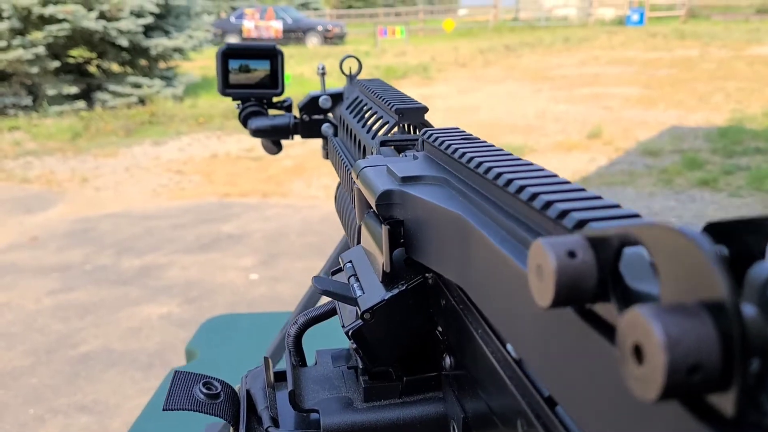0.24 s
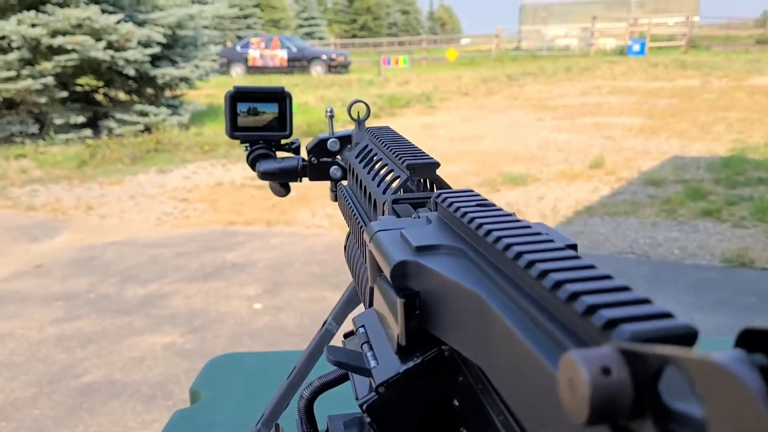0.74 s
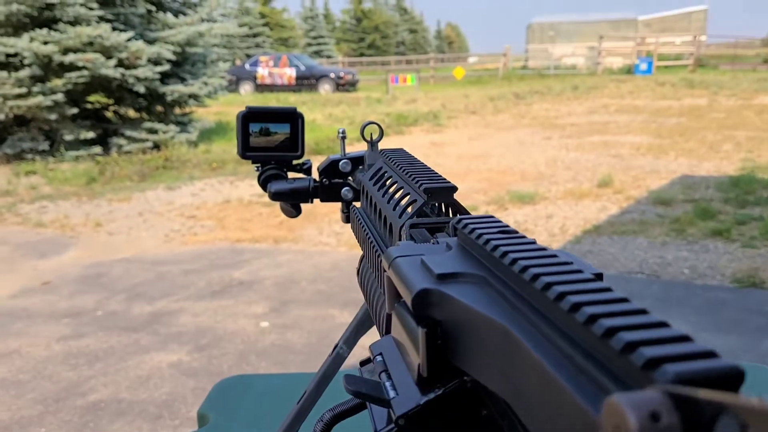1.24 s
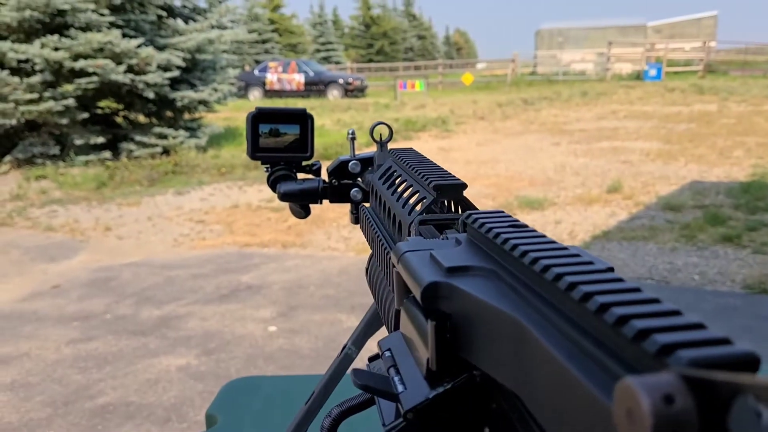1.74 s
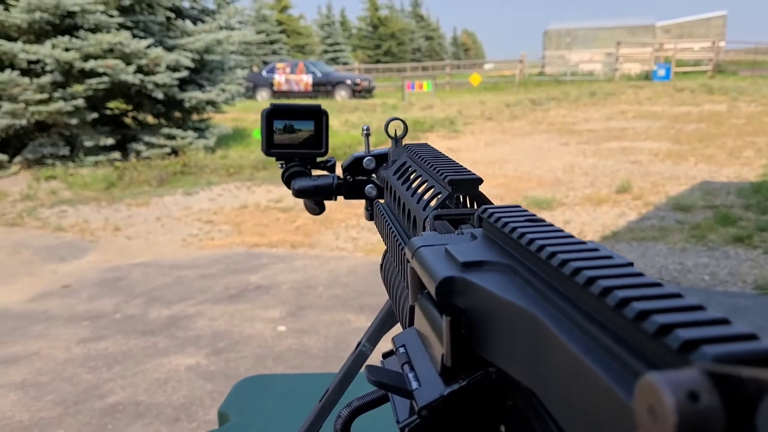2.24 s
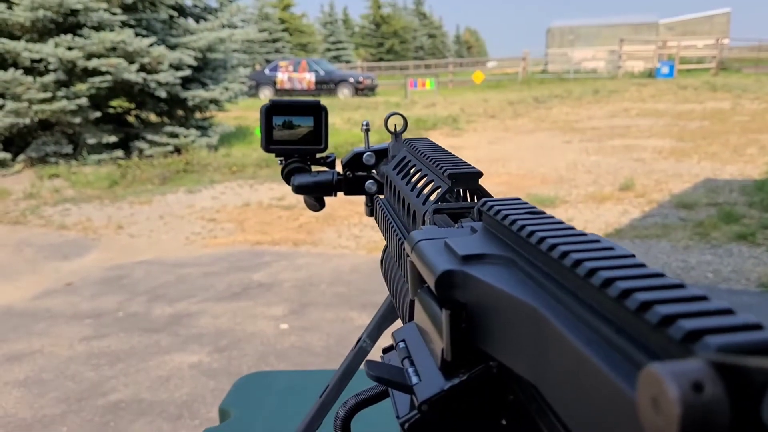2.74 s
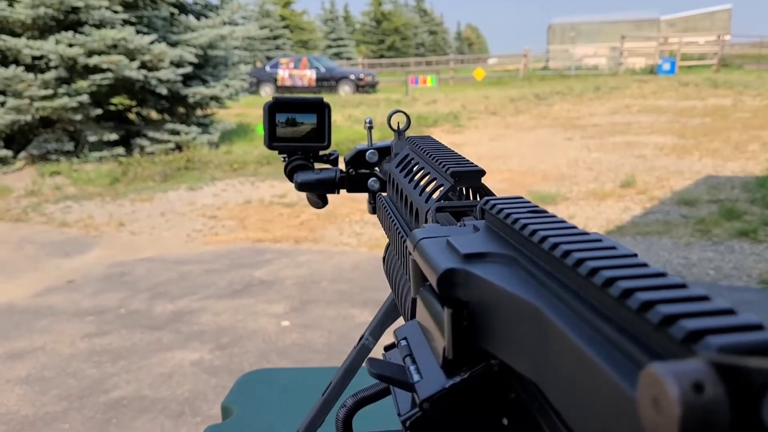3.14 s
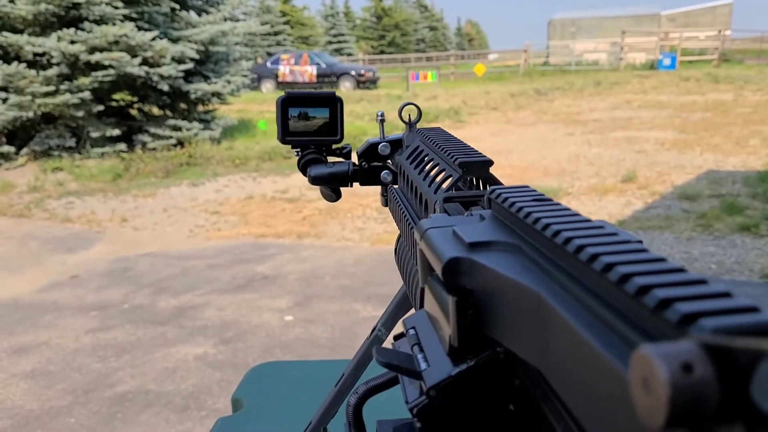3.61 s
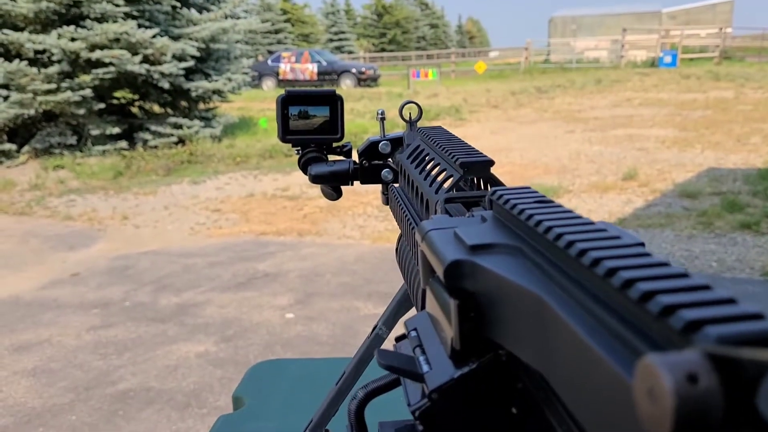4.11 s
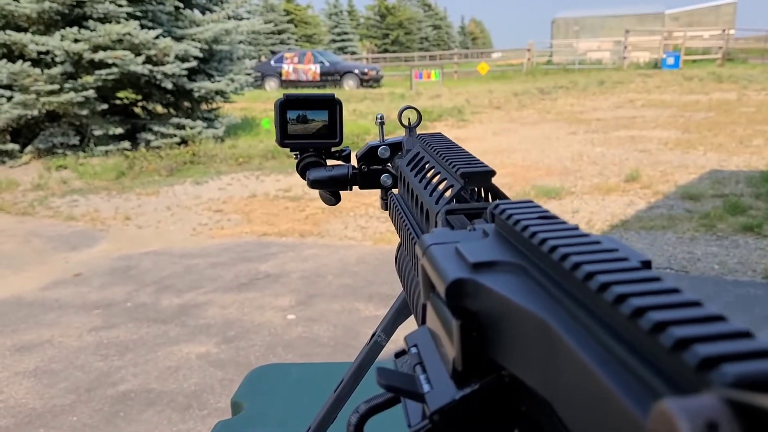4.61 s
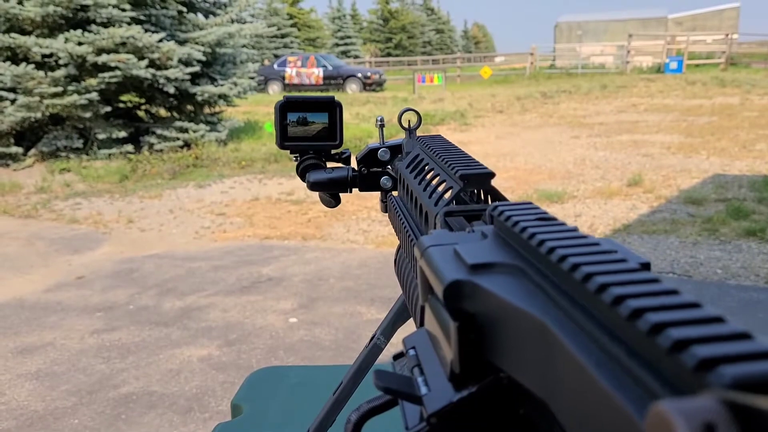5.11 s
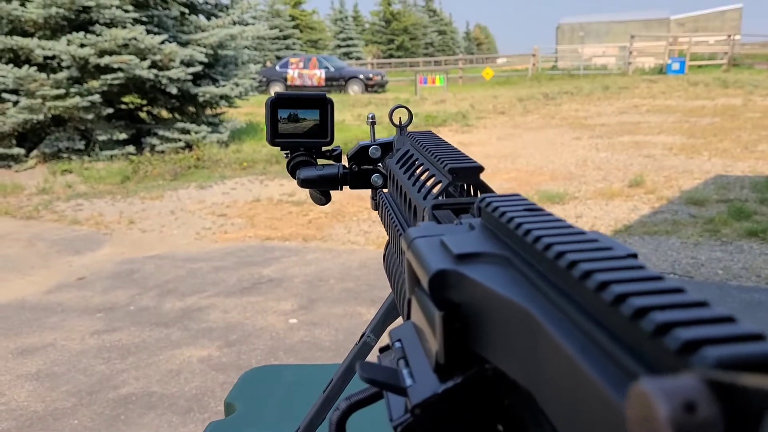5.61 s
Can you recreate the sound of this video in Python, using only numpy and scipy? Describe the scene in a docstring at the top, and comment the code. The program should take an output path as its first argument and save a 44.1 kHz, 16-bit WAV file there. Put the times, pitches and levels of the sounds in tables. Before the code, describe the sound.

Close up in an open field, an electric airsoft gun rattles off uneven-length bursts, its motor whining up and gears coasting down between them.

```python
"""Over an open field, close by, a battery airsoft machine gun fires short bursts.
Each gearbox turn winds the piston back: filtered noise rattles as teeth, a phase-summed sine sags in pitch.
Each slam excites the damped modes of the receiver and main spring, and swings the gun in recoil.
After a burst the gears coast and a latch drops; trigger clicks, a scattered tail and faint air noise remain."""
import sys
import numpy as np
from scipy import signal
from scipy.fft import rfft, irfft, next_fast_len
from scipy.io import wavfile

SR = 44100
rng = np.random.default_rng(int(sys.argv[2]) if len(sys.argv) > 2 else 0)


def bounce(signal):
    """Save signal as a 16-bit WAV file at the path given by the first command-line argument."""
    frames = np.transpose(np.atleast_2d(signal))
    limited = np.clip(frames, -1, 1)
    pcm = np.round(limited * 32767).astype(np.int16)
    wavfile.write(sys.argv[1], SR, pcm)


N = 258426
TIME = np.arange(N) / SR
AGE = TIME[:SR // 8]  # time since an impact [s]


def undb(db):
    """Logarithmic level: decibels become an amplitude ratio."""
    return 10 ** (np.asarray(db) / 20)


def unit(x):
    """Mean power: scale to an rms of 1."""
    return x / np.sqrt(np.mean(x ** 2))


def add(out, s, sound):
    """Superposition: mix a sound in at time s."""
    i = int(np.clip(s * SR, 0, N - 1))
    out[..., i:i + sound.shape[-1]] += sound[..., :N - i]


def decay(age, t60):
    """Exponential damping: the amplitude falls by 60 dB in t60 seconds."""
    return np.exp(-np.log(1000) * age / t60)


def resonance_db(hz, peaks):
    """Resonance: each peak lifts the level in a bell about its centre."""
    return sum(gain / (1 + (2 * (hz - centre) / width) ** 2) for centre, width, gain in peaks)


def colour(x, points, peaks=()):
    """Minimum phase: a folded cepstrum turns broad levels plus resonances into a causal filter."""
    hz = np.fft.rfftfreq(4096, 1 / SR) + 1  # the offset avoids log(0)
    knots, dbs = np.transpose(points)
    db = np.interp(np.log(hz), np.log(knots), dbs) + resonance_db(hz, peaks)
    cepstrum = irfft(np.log(undb(db)))
    half = len(cepstrum) // 2
    fold = np.r_[1, np.full(half - 1, 2), np.zeros(half)]
    impulse = irfft(np.exp(rfft(cepstrum * fold)))
    return signal.fftconvolve(x, impulse[None], axes=1)[:, :x.shape[1]]


def ports(split_hz, apart=0.86):
    """Spatial coherence: noise at two ports, alike in the bass, loosely related above the split."""
    mid, side = rng.standard_normal((2, N))
    side = apart * signal.sosfilt(signal.butter(2, split_hz, "high", fs=SR, output="sos"), side)
    return unit(np.array([mid + side, mid - side]))


def waver(hz):
    """Band-limited chance: low-passed noise gives a smooth fluctuation with a spread of 1."""
    return unit(signal.sosfilt(signal.butter(2, hz, fs=SR, output="sos"), rng.standard_normal(N)))


def panels(x, ring_db=-6, t60=0.07):
    """Modal density: thin steel covers ring with countless short modes, differently towards each port."""
    ring = rng.standard_normal((2, len(AGE))) * decay(AGE, t60)
    ring = signal.sosfilt(signal.butter(2, 2200, "high", fs=SR, output="sos"), ring)
    ring = ring / np.sqrt(np.sum(ring ** 2) / 2)
    return x + undb(ring_db) * signal.fftconvolve(x, ring, axes=1)[:, :N]


# modes of the receiver: (frequency [Hz], decay time t60 [s], relative level [dB], left minus right [dB])
RECEIVER_MODES = [(376, 0.045, -6.5, -1.5), (475, 0.019, -3.5, 4.5), (774.6, 0.024, 6, -3),
                  (800, 0.0065, -12.5, -3.5), (1036, 0.029, 0.5, 7.5), (1233, 0.014, -2.5, 18.5),
                  (1510, 0.043, -19.5, 20), (1730, 0.042, -27, 3.5), (3227, 0.044, -15.5, -3.5),
                  (4500, .03, -4.5, 5)]


def receiver(contact_s):
    """Impact excitation: a blow rings slightly varied modes, and a longer contact softens the treble."""
    ring = 0
    for f, t60, db, pan in RECEIVER_MODES:
        detune, lift_db = rng.standard_normal(2) * [.012, 1.2]
        gain = undb(db + lift_db + np.array([[pan], [-pan]]) / 2)
        ring = ring + gain * np.cos(2 * np.pi * f * (1 + detune) * AGE) * decay(AGE, t60)
    push = AGE * np.exp(-AGE / contact_s)
    return signal.fftconvolve(ring, push[None] / push.sum(), axes=1)[:, :len(AGE)]


def recoil(hz, cycles):
    """Momentum exchange: the gun rocks for a few swings as the piston flies forward and stops."""
    swing = np.minimum(AGE * hz / cycles, 1)
    return -np.sin(2 * np.pi * hz * AGE) * np.sin(np.pi * swing ** 0.7) ** 2


# modes of the main spring, before the common fade: (frequency [Hz], decay time t60 [s], relative level [dB])
SPRING_MODES = [(83.5, 0.45, -1.5), (118, 1, -9.5), (158.5, 1, -3.5), (224, 0.2, -12.5), (311.3, 0.22, -22),
                (344.8, 1, 0.5), (393, .3, -1.5), (439, 0.97, -7.5), (632, 0.31, 1), (720, 0.14, -10)]


def spring(kicks, spring_db=-38, fade_s=0.24):
    """Modal vibration: the main spring rings after each slam and dies out within about a quarter second."""
    age = TIME[:SR // 2]
    ring = sum(undb(db) * np.sin(2 * np.pi * f * age) * decay(age, t60) for f, t60, db in SPRING_MODES)
    ring = ring * np.exp(-(age / fade_s) ** 4)
    chafing = undb(2.5 * waver(25))
    return undb(spring_db) * chafing * signal.fftconvolve(kicks, ring)[:N]


# nominal instants at which the piston slams home, grouped by burst: (time [s])
SHOTS = [0.0139, .1, 0.1786, 0.2538, 0.3275, 0.4016, 0.7391, .8352, 0.9168, .9923, 1.079, 1.6956, 1.783,
         1.862, 1.9544, 2.2135, 2.3056, 2.6303, 2.719, 2.797, 2.8725, 2.9565, 3.339, 3.4271, 3.505, 3.5829,
         3.8725, 3.9643, 4.0451, 4.1267, 4.961, 5.052, 5.1331, 5.2091, 5.287, 5.5943, 5.6884, 5.768, 5.844]
# two shots in every twelve kick deep and slam later and more softly
DEEP_CYCLE, DEEP_PLACES, DEEP_SLAM_DB = 12, (4, 8), -3


def piston(slam_db=-8.5, bounce_db=-8, bounce_s=0.002348, release_db=-17, pickup_db=-28, pickup_s=.023,
           rock_db=-14, deep_db=-11.0, push_db=-23, sway_db=-21, crack_db=-16.5, crack_s=0.0062,
           crack_rise_s=0.0004, snap_db=-15.0, snap_s=0.00069):
    """Energy release: the gear lets go, the gun rocks, the piston slams and bounces, the gear picks it up."""
    out = np.zeros((2, N))
    crack, snap, kicks = np.zeros((3, N))
    crack_shape = 2 * np.exp(-AGE / crack_s) * (1 - np.exp(-AGE / crack_rise_s))
    snap_shape = np.exp(-((AGE - .0026) / snap_s) ** 2)
    for k, s in enumerate(SHOTS):
        deep = k % DEEP_CYCLE in DEEP_PLACES
        level_db = DEEP_SLAM_DB * deep
        slam = s - .0015 + 0.0034 * deep
        # the gear lets go with a clack
        add(out, s - .0085, undb(slam_db + release_db) * receiver(contact_s=.00007))
        add(out, s - .0064, undb(rock_db) * (1 - 0.13 * deep) * recoil(hz=193.0, cycles=3.69))
        add(out, s - .009, (undb(push_db) + deep * undb(deep_db)) * recoil(hz=111.3, cycles=2.3))
        add(out, s - .002, deep * undb(sway_db) * recoil(hz=202, cycles=7))  # a deep kick leaves it swaying
        add(out, slam, undb(slam_db + level_db) * receiver(contact_s=.00007))
        add(out, slam + bounce_s, undb(slam_db + bounce_db + level_db) * receiver(contact_s=.00005))
        for delay, size in rng.uniform(0, 1, (3, 2)):  # the first teeth knock on the rack
            knock = undb(pickup_db) * (.5 + size) * receiver(contact_s=0.00038)
            add(out, s + pickup_s + .014 * delay, knock)
        add(crack, slam, undb(crack_db + level_db) * crack_shape)
        add(snap, slam, undb(snap_db + level_db) * snap_shape)
        add(kicks, slam, rng.uniform(.7, 1.3, 1))
    metal = colour(crack * ports(split_hz=1160),
                   [(100, 2.0), (600, 4.5), (1400, 16.5), (2300, 0), (4600, 1.5), (6500, -4),
                    (11000, -3.0), (16000, -3.5)])
    # air leaves the nozzle
    puff = colour(snap * ports(split_hz=1000), [(1000, -30.0), (6000, -10.5), (10000, -4.5), (16000, -4)])
    return out + panels(metal) + puff + spring(kicks)


# trigger pulls: (motor on [s], starting strain [dB], gear rattle [dB], whine of the first turn at speed [dB],
# coasting level [dB], coasting time [ratio to the usual]); levels are relative
BURSTS = [(-.085, 7, 1, 6.5, 1.5, 1), (.672, 6.5, 0, 5.5, -1.5, 1.33), (1.593, 6.5, 0, 7, -5, 1.45),
          (2.108, 2.5, -1, -7, 1, 1), (2.527, 5, 0, 4, 1.5, 1), (3.24, 5, 0, 4, 0.5, 1),
          (3.79, 4, 0.1, 3, -.5, .95), (4.871, 9, 1.5, 6.5, 1.5, 1), (5.513, 5, 0.1, 4.5, 7, 1)]


def volleys():
    """Causality: each burst owns the shots between its motor start and the next."""
    ons = [row[0] for row in BURSTS] + [np.inf]
    return [[s for s in SHOTS if on < s < until] for on, until in zip(ons, ons[1:])]


# rattle is quieter around each slam, louder through the middle of the turn; shares are fractions of a turn
QUIET_DB, LOUD_DB, LOUD_FROM_SHARE, LOUD_UNTIL_SHARE = -9, 4.5, 0.27, 0.97
# after the last shot the gears rattle on, then die away (both times scaled by the coasting ratio)
COAST_HOLD_S, COAST_FADE_S = 0.046, 0.062
# the pinion sings most on the first turn at speed, then settles
WHINE_LATER_DB, WHINE_FADE_TURNS = -5, 0.41
SPEED_POWER = .35  # a quick turn whines higher than a slow one
START_RATTLE_DB = -7  # the teeth rattle less while the motor gathers speed
# the pinion sings once more as the spring brakes it (times scaled by the coasting ratio)
BRAKE_DB, BRAKE_S, BRAKE_WIDTH_S = -4.5, .078, 0.021


def drive(run_hz=3390, turn_s=.08, sag=.35, free_hz=2720, spin_up_s=0.065, bite_s=0.029, coast_s=.11):
    """Load and speed: tooth rate [Hz] and gains of rattle, whine and strain follow the motor turn by turn."""
    hz, rattle, whine, strain = np.zeros((4, N))
    for (start, strain_db, rattle_db, whine_db, coast_db, stretch), shots in zip(BURSTS, volleys()):
        for k, s in enumerate(shots):
            now = (TIME >= start) & (TIME < s)
            age = TIME[now] - start
            share = age / (s - start)
            if k == 0:  # the motor strains up from rest
                hz[now] = free_hz * (1 - np.exp(-age / spin_up_s))
                strain[now] = undb(strain_db) * np.sin(np.pi / 2 * np.minimum(age / bite_s, 1)) ** 2
                load = undb(START_RATTLE_DB) * strain[now] * np.sqrt(hz[now] / free_hz)
            else:  # the tightening spring slows it through each turn
                pace = (turn_s / (s - start)) ** SPEED_POWER
                hz[now] = run_hz * pace * (1 + sag * (.7 - share))
                turn_db = np.interp(share, [0, LOUD_FROM_SHARE, LOUD_UNTIL_SHARE, 1],
                                    [QUIET_DB, LOUD_DB, LOUD_DB, QUIET_DB])
                load = undb(rattle_db + turn_db)
                settling = np.exp((1 - k) / WHINE_FADE_TURNS)
                singing = undb(WHINE_LATER_DB + (whine_db - WHINE_LATER_DB) * settling)
                whine[now] = singing * np.interp(share, [.35, .62, .8, .93], [0, 1, 1, 0])
            rattle[now] = np.maximum(rattle[now], load)
            start = s
        after = TIME >= start  # the gears coast down
        age = (TIME[after] - start) / stretch
        hz[after] = run_hz * np.maximum(1 - age / coast_s, .03)
        quiet_db = QUIET_DB * (age < LOUD_FROM_SHARE * turn_s)
        fade = np.exp(-(np.maximum(age - COAST_HOLD_S, 0) / COAST_FADE_S) ** 2)
        rattle[after] = undb(coast_db + quiet_db) * fade
        whine[after] = undb(coast_db + BRAKE_DB) * np.exp(-((age - BRAKE_S) / BRAKE_WIDTH_S) ** 2)
    return hz, rattle, whine, strain


def flicker(x, depth_db=3.0):
    """Random contact: teeth touch at ever new spots, so each part of the spectrum flickers on its own."""
    edges = [0, 500, 1000, 1600, 2300, 3100, 3900, 4700, 5600, 7000, 9500, 13000, SR / 2]
    size = next_fast_len(N)
    hz, spectrum = np.fft.rfftfreq(size, 1 / SR), rfft(x, size)
    out = np.zeros((2, N))
    for band in np.eye(len(edges)):  # overlapping triangular bands
        part = irfft(spectrum * np.interp(hz, edges, band), size)[:, :N]
        out += part * undb(depth_db * waver(47))
    return out


# broad colour of the gearbox shell: (frequency [Hz], relative level [dB])
SHELL = [(40, -7), (130, 4), (350, 0), (560, -4.5), (1000, -1.5), (2300, -3), (4000, -3.5), (6500, -3),
         (9000, -2.5), (12000, -4.5), (16000, -6)]
# resonances of the shell, which also colour the latch: (frequency [Hz], width [Hz], gain [dB])
SHELL_PEAKS = [(780, 277, 13.7), (1570, 403, 6.1), (3240, 1850, 9.54), (4660, 250, 6.4), (5310, 470, 3.7),
               (5410, 120, 8.84), (8540, 250, 5.1)]


def swell(hz):
    """Resonant amplification: a tooth tone swells wherever it crosses a resonance of the shell."""
    return undb(resonance_db(hz, SHELL_PEAKS)) / 2


def gearbox(rattle_db=-26, whine_db=-23, mesh_db=-40, strain_db=-25, octave_db=-35, grind_db=-29.5,
            groan_db=-27, groan_hz=800, gate=0.17, throb=0.26):
    """Gear meshing: teeth rattle in the shell; under load the pinion sings, throbbing with the shaft."""
    hz, rattle, whine, strain = drive()
    jitter = (.018 + .004 * np.minimum(strain, 1)) * waver(300)
    phase = 2 * np.pi * np.cumsum(hz * (1 + jitter)) / SR
    shaft = np.sin(phase / 10)  # ten teeth on the pinion
    grain = undb(1.8 * waver(300))
    teeth = unit(colour(ports(split_hz=970) * grain * (1 + gate * shaft), SHELL, SHELL_PEAKS))
    # a straining motor grinds lower than a running one
    grind = unit(colour(ports(split_hz=210) * grain,
                        [(300, -28.5), (700, -3.5), (1700, -3.5), (5500, -4.0), (8000, -18), (16000, -40.0)],
                        SHELL_PEAKS))
    radiation = np.interp(hz, [600, 1650], [0, 1])  # slow teeth hardly radiate a tone
    uneven = undb(3 * waver(90)) * (1 + throb * np.sin(phase / 20))
    tone_gain = undb(whine_db) * whine + undb(mesh_db) * rattle + undb(strain_db) * strain
    tone = np.sin(phase) * tone_gain * swell(hz)
    octave = np.sin(2 * phase) * undb(octave_db) * strain * swell(2 * hz)
    # slow teeth knock unevenly and set the lowest shell mode groaning as they pass through it
    mode_band = signal.butter(2, [715, 860], "band", fs=SR, output="sos")
    mode = unit(signal.sosfilt(mode_band, rng.standard_normal(N)))
    groan = undb(groan_db) * mode * np.sqrt(rattle) * np.exp(-((hz - groan_hz) / 380) ** 2)
    noise = panels(flicker(undb(rattle_db) * rattle * teeth + undb(grind_db) * strain * grind))
    tonal = (tone + octave) * uneven * radiation + groan
    return noise + tonal * undb([[-1.5], [1.5]])  # left, right


# trigger clicks: (time [s], relative level [dB], treble relative to it [dB])
CLICKS = [(.655, -13, -7.5), (3.2141, -11, -10), (4.3258, -29, -27), (4.375, -19, -2),
          (5.4602, -10.5, -22.5)]
# the latch drops this long after the last shot of a burst; its level also follows the coasting level
LATCH_S, LATCH_DB, LATCH_TREBLE_DB = .127, -6, -30.5


def latch(click_db=-6, bright_db=9, ring_s=0.0042, rebound_s=0.016, rebound=0.18):
    """Impact and rebound: small steel parts strike the shell twice, the latch after bursts and the trigger."""
    dull, bright = np.zeros((2, N))
    snap = np.exp(-AGE / ring_s) * (1 - np.exp(-AGE / .0012))
    drops = [(shots[-1] + LATCH_S, LATCH_DB + 2 * coast_db, LATCH_TREBLE_DB)
             for (*_, coast_db, _), shots in zip(BURSTS, volleys())]
    for s, db, treble_db in drops + CLICKS:
        for delay, size in ((0, 1), (rebound_s, rebound)):
            add(dull, s + delay, size * undb(db + click_db) * snap)
            add(bright, s + delay, size * undb(db + click_db + treble_db + bright_db) * snap)
    thud = colour(dull * ports(split_hz=1000),
                  [(100, -2.0), (1600, -7), (5000, -10.0), (16000, -17.5)], SHELL_PEAKS)
    tick = colour(bright * ports(split_hz=1500), [(2000, -37.5), (8000, -5), (12000, -4), (16000, -9)])
    return thud + tick


def field(x, wet_db=-27, t60=0.66):
    """Diffuse scattering: ground, porch and trees return a faint, dull, decaying tail."""
    age = TIME[:SR]
    tail = rng.standard_normal((2, SR)) * decay(age, t60) * (age > .004)
    tail = colour(tail, [(100, -5.5), (1500, -8.0), (4000, -9.0), (15000, -10.0)])
    tail = tail / np.sqrt(np.sum(tail ** 2) / 2)
    return undb(wet_db) * signal.fftconvolve(x, tail, axes=1)[:, :N]


# spectrum of the outdoor air: (frequency [Hz], relative spectral level [dB])
AIR = [(15, -32.5), (25, 6), (108, 3.5), (200, -9.5), (354, -7), (962, -25.5), (1440, -20.5), (1560, -11),
       (1840, -30.5), (2480, -24.5), (4030, -32), (5140, -44), (8360, -42.5), (16000, -58)]


def air(level_db=-58):
    """Stationary noise: still outdoor air as a steady coloured hiss and rumble."""
    return undb(level_db) * unit(colour(ports(split_hz=500), AIR))


def scene(port_lag_s=.00036):
    """Arrival-time difference: the gun reaches the left port later, so it sits a little to the right."""
    left, right = piston() + gearbox() + latch()
    left = np.pad(left, (round(port_lag_s * SR), 0))[:N]
    gun = np.array([left, right])
    return gun + field(gun) + air()


def record(dry, top_hz=16000):
    """Soft saturation and band limiting: tanh rounds the loudest peaks, a steep low-pass cuts the top."""
    rounded = np.tanh(0.57 * dry) / 0.83
    return signal.sosfilt(signal.ellip(10, .2, 80, top_hz, fs=SR, output="sos"), rounded)


dry = scene()
out = record(dry)
bounce(out)
```